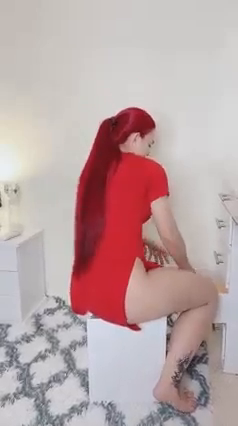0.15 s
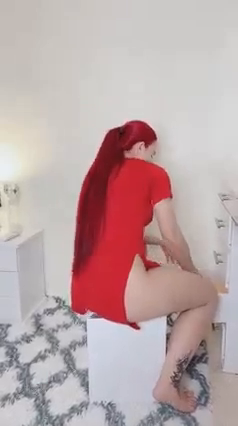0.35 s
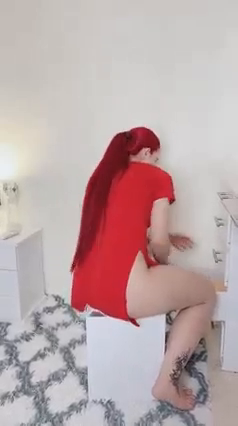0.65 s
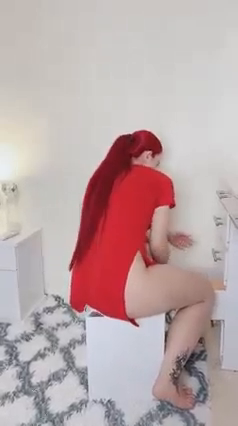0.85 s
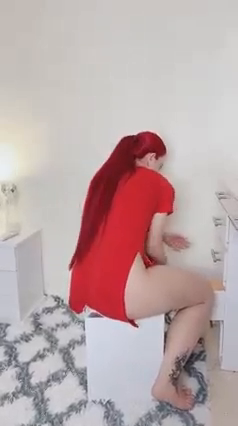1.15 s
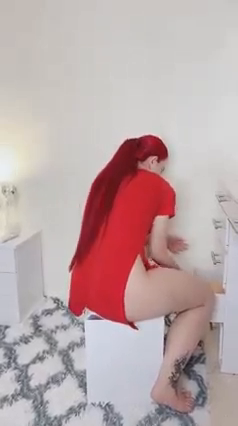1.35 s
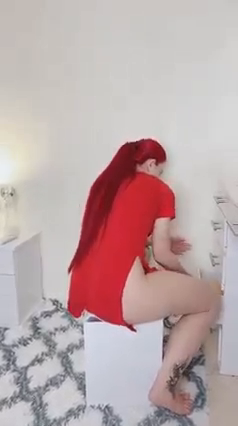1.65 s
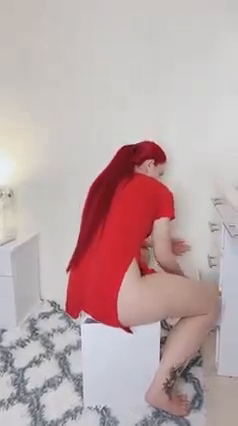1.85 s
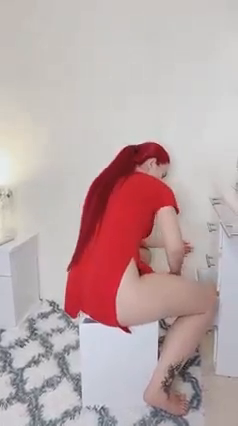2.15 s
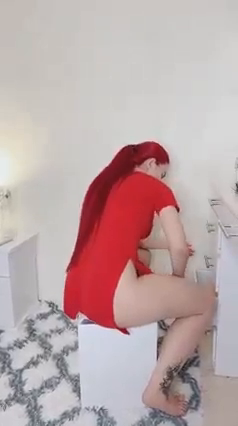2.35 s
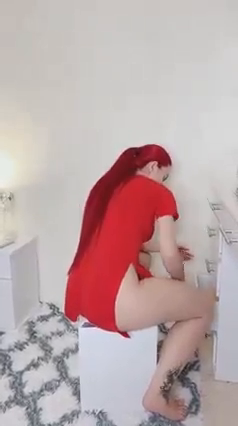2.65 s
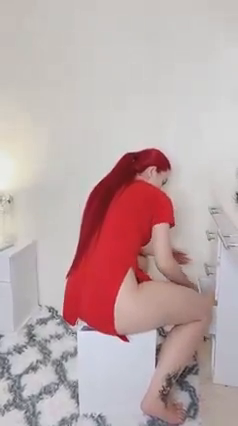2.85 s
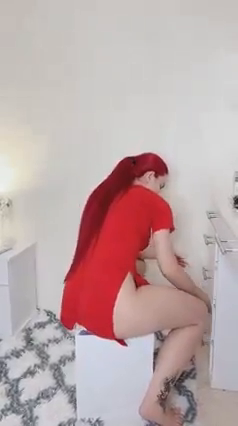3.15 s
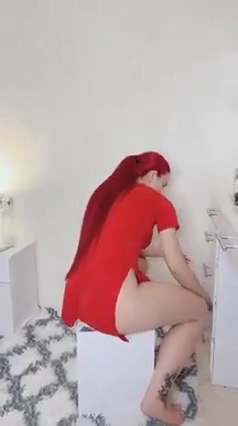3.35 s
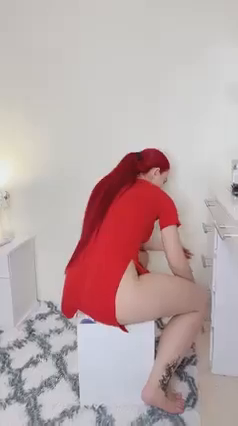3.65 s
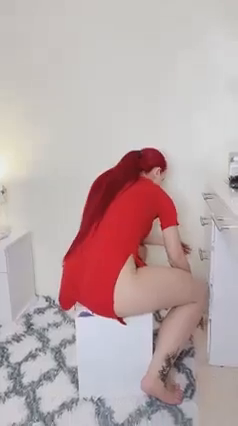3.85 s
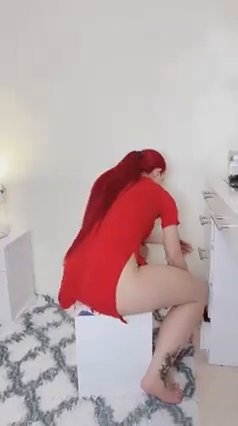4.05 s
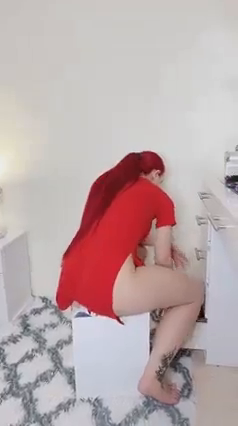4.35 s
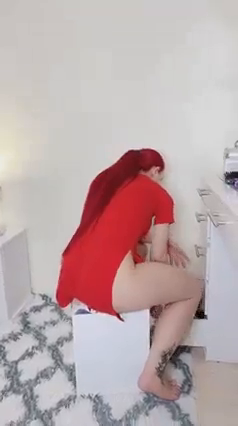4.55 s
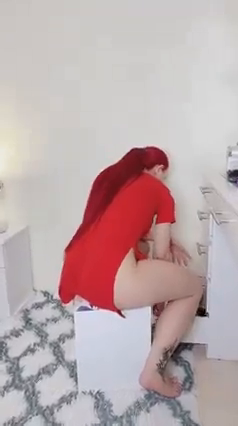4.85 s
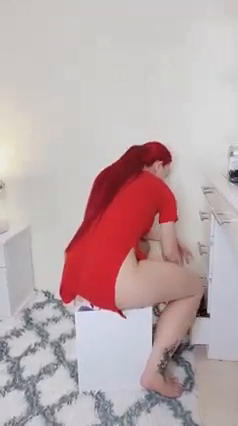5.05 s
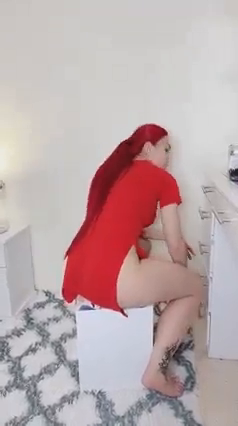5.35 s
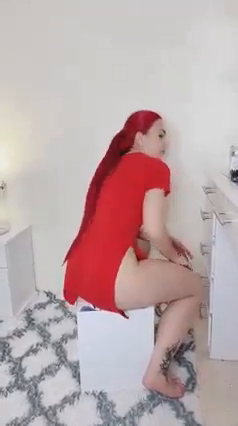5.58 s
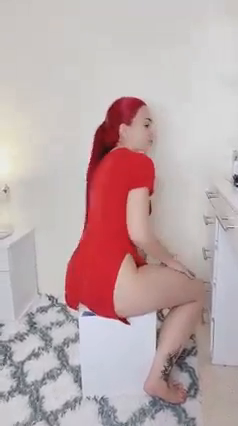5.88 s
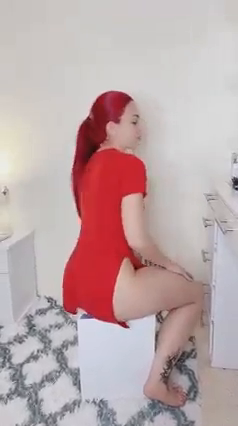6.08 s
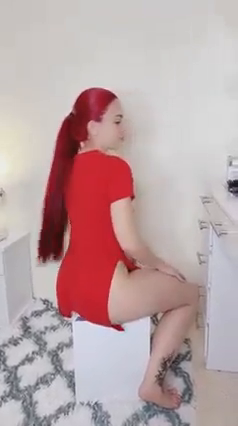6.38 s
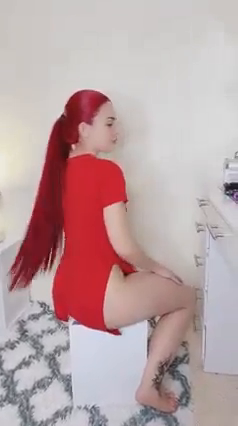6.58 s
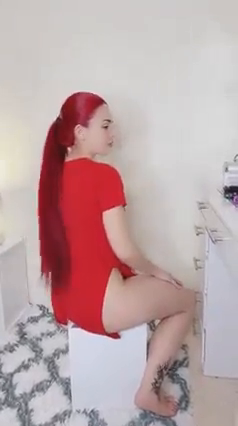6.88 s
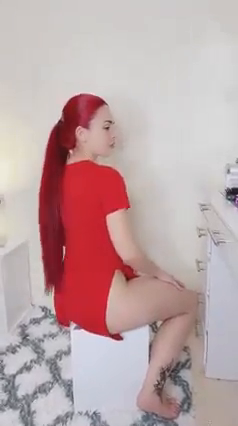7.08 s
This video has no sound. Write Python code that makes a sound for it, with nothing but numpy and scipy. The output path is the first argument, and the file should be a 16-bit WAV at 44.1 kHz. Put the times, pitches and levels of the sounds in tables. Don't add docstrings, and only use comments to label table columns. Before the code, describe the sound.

Wooden drawers thud and scrape in a quiet bedroom, with hollow cabinet booms, dry cracks, a small rolling rattle and faint cloth rustle.

```python
import sys
import numpy as np
from scipy import signal
from scipy.fft import rfft, irfft, next_fast_len
from scipy.io import wavfile
from scipy.ndimage import uniform_filter1d

SR = 44100
rng = np.random.default_rng(int(sys.argv[2]) if len(sys.argv) > 2 else 0)


def file_out(sig):
    cols = np.atleast_2d(sig).T
    lim = np.clip(cols, -1, 1)
    pcm = np.round(lim * 32767).astype(np.int16)
    wavfile.write(sys.argv[1], SR, pcm)


def volts_from_db(level):
    exponent = np.asarray(level, float) / 20
    return 10 ** exponent


N = 318327


def evened(x):
    return x / np.sqrt(np.mean(x ** 2) + 1e-20)


def peaked(x):
    return x / np.sqrt(uniform_filter1d(x ** 2, size=441).max() + 1e-20)


def smoothed(x, size_0, size_1):
    return evened(uniform_filter1d(uniform_filter1d(x, size=size_0, axis=0), size=size_1, axis=1))


def read(points, hz):
    f, value = np.transpose(points)
    return np.interp(np.log(hz + 1), np.log(f + 1), value)


def add(mix, s, sound):
    part = mix[round(s * SR):][:len(sound)]
    part += sound[:len(part)]


def coloured(x, points):
    size = next_fast_len(x.shape[-1])
    gain = volts_from_db(read(points, np.fft.rfftfreq(size, 1 / SR)))
    return irfft(rfft(x, size) * gain, size)[..., :x.shape[-1]]


def mode(t, hz, t60, turn=0):
    return np.sin(2 * np.pi * (hz * t + turn)) * volts_from_db(-60 * t / max(t60, .01))


def blows():
    # time in seconds, strength in dB, hollow boom and
    # small panels in dB against strength, contact time in ms.
    held = [
        (0.578, -17, -14.5, -11.5, 23),
        (1.083, -35.5, 7, 0.5, 10.5),
        (1.145, -17.5, -3, -25.5, 14.3),
        (1.588, -20, -2.5, 7.4, 12),
        (1.619, -20, -21, -8.5, 21),
        (2.891, -23, -11, -21.5, 7.8),
        (4.044, -21, -3.5, 1.5, 42),
    ]
    bumps = [(0.487, -34.5, -12, 0.5, 21), (0.519, -21, -34, -5, 16), (0.619, -37.5, -7, -9.5, 5.7),
             (1.199, -33.5, 9, -5.5, 14), (1.334, -10.5, -20, -9, 29), (1.368, -4.5, -1.5, -13, 15),
             (2.704, -31.5, -11.5, -20, 12), (2.745, -14, -9.5, -6.5, 21.3), (2.851, -12, -10, -19, 6.9),
             (3.105, -9.5, -8, -7, 19.3), (3.189, -42, 7.5, 7.5, 10), (4.089, -25.5, -0.5, -0.5, 12),
             (4.338, -23, -11, -8.5, 10), (4.884, -12, -12.5, -4, 15.3), (4.919, -24.5, -9.5, -4.5, 23),
             (4.967, -31, 0, 8.5, 9.1), (5.174, -18.5, -5.5, -6, 8.6), (5.501, -18.5, -9.5, -18, 15.2),
             (5.548, -22.5, -26, -16, 7.3)]
    free = [
        (0.463, -23.5, -10, -2.5, 27),
        (0.905, -47, 2.3, -1, 16),
        (1.032, -26.5, -15.5, -19.5, 14.6),
        (1.544, -16.5, -14.5, -1, 21),
        (1.679, -37.5, 4, -13.5, 14),
        (3.244, -19.5, -10, -11.5, 23),
        (3.984, -19.5, -2, -7, 22),
        (4.389, -37.5, 2.8, -7, 11),
        (5.203, -4.5, -2, -2.7, 7.5),
    ]
    kinds = [(held, .06), (bumps, .17), (free, .28)]
    return sorted((*row, t60) for rows, t60 in kinds for row in rows)


def thuds():
    # frequency in Hz, level in dB, t60 in seconds.
    air_modes = [(103.35, 7.5, 0.4), (136.5, 3, 0.17), (79.5, -16, 0.068), (51.6, -18, 0.66)]
    panel_hz = np.geomspace(140, 455, 22)
    out, t = np.zeros(N), np.arange(SR // 3) / SR
    rows = blows()
    spots = rng.standard_normal((len(rows), 2, len(panel_hz)))
    grits = rng.standard_normal((len(rows), SR // 8))
    edges = np.clip(np.minimum(t / .003, (t[-1] - t) / .1), 0, 1)
    for (s, force_db, boom_db, small_db, contact_ms, t60), (share, shift), grit in zip(rows, spots, grits):
        u = t[:len(grit)] * 1000 / max(contact_ms, 1)
        contact = grit * u * np.exp(-2.2 * u)

        hz, sign = panel_hz * (1 + .02 * shift), np.sign(share)
        modes = np.array([a * mode(t, f, t60 * (250 / f) ** 0.79) for f, a in zip(hz, sign)])
        large = signal.fftconvolve(modes[hz < 270].sum(0), contact)[:len(t)]
        large = coloured(large, [(90, -27.5), (140, -1)])
        small = signal.fftconvolve(modes[hz >= 270].sum(0), contact)[:len(t)]
        small = coloured(small, [(340, -8.5), (460, -11), (900, -21.5)])

        boom = sum(volts_from_db(db + 1.5 * a) * mode(t, f, ring) for (f, db, ring), a in zip(air_modes, shift))
        boom = boom * (1 - np.exp(-t * 900 / max(contact_ms, 1)))

        blow = volts_from_db(-6.5) * peaked(large)
        blow = blow + volts_from_db(small_db - 2.5) * peaked(small) + volts_from_db(boom_db + 0.5) * peaked(boom)
        add(out, s - .004, volts_from_db(force_db) * blow * edges)
    return out


def cracks():
    # time in seconds, strength in dB, woody body and bright edge
    # in dB against strength, rise in ms.
    ticks = [
        (0.5099, -37.5, 6, -3, 2.4),
        (0.8976, -43, -7.5, 11.5, 4.3),
        (1.0268, -43, 0, -7, 5.8),
        (3.1035, -26.5, 8.5, 0, 13.4),
        (3.251, -39, 1.5, -16, 4.6),
        (4.3367, -32, 5.5, -5, 4.8),
        (5.1728, -37, 3, -12, 1.5),
        (5.4951, -27.5, 4, -7, 8.9),
    ]
    rattles = [(0.445, -47.5, 8, 6.5, 15), (0.4724, -38, 8.5, 6, 9.9), (0.5794, -48, 14.5, 3.5, 7.3),
               (1.0755, -44.5, 0, -23, 2.4), (1.1535, -45, 6, -5.5, 4), (1.1777, -39, -2.5, -28, 6.2),
               (1.3274, -30, 7.5, -3.5, 27), (1.3603, -22.5, -1, -3, 2.3), (1.5419, -24, 4.5, -3.5, 13.4),
               (1.6756, -45, 6.5, -4.5, 3.9), (1.8272, -62, -1, 9, 3.9), (2.155, -53, -6, -25, 3.1),
               (2.714, -46.5, 1, -6, 8.8), (2.7418, -37.5, 2, -9.5, 4), (2.8512, -37.5, 5, -16, 2.6),
               (3.19, -63, 0, -1, 8.4), (3.2294, -64.5, 25.5, -9, 5.1), (3.972, -40.5, 10, -8, 20),
               (4.0454, -33.5, 9, -14, 4.8), (4.4967, -47.5, -1, -2, 6.8), (4.8823, -36.5, 6, -10.1, 3),
               (5.2009, -16, 1.1, -4.5, 0.86)]
    tick_t60, rattle_t60 = 0.013, 0.12
    out, t = np.zeros(N), np.arange(SR // 3) / SR
    rows = sorted([(*row, tick_t60) for row in ticks] + [(*row, rattle_t60) for row in rattles])
    noises = rng.standard_normal((len(rows), len(t)))
    for (s, force_db, low_db, high_db, rise_ms, t60), noise in zip(rows, noises):
        colour = [(350, low_db - 21.5), (600, low_db + 9.5), (1100, low_db - 2),
                  (2500, -5.5), (6500, high_db - 9), (11000, high_db - 13)]
        decay = 0.92 * volts_from_db(-60 * t / 0.053) + .5 * volts_from_db(-60 * t / max(t60, .01))
        shape = decay * (1 - np.exp(-t * 1000 / max(rise_ms, .2)))
        add(out, s - .0015, volts_from_db(force_db + 12.5) * coloured(noise, colour) * shape)
    return out


def slides():
    # frequency in Hz, density in dB per Hz.
    rumble_colour = [(24, -37), (40, -5), (82, -12.5), (206, 2), (503, -14.5), (586, -13.5), (671, -29),
                     (1270, -31), (1500, -37.5), (1950, -56.5), (3300, -120)]
    hiss_colour = [(410, -32.5), (700, -2), (1150, -5.5), (1530, -9), (1760, -6.5), (4280, -14), (7700, -8),
                   (9800, -17.5), (11000, -39), (14300, -79), (22000, -120)]
    # start in seconds, length in
    # seconds, pressure in dB, pressure change in dB, load on the panels in dB.
    strokes = [
        (0.46, 0.14, -47.5, -6.5, 0),
        (1.058, 0.4, -57, 8, 13.5),
        (1.532, 0.17, -34, -28, 13.5),
        (1.71, 0.18, -62.5, -6.5, 3),
        (2.767, 0.49, -50.5, -4.5, 3),
        (4.01, 0.53, -50, -8, -1),
        (4.463, .14, -61, 1.5, 14.5),
        (4.734, 0.12, -75.5, 23, 1.5),
        (4.857, 0.33, -48.5, -2.5, 9.5),
        (5.28, .2, -57.5, -8.5, 26),
    ]
    # start in seconds, length in seconds, level in dB.
    rustles = [
        (-.3, 1, -70),
        (1.81, 0.64, -66.5),
        (2.38, 0.42, -66.5),
        (3.435, 1, -72.5),
        (5.54, .35, -69.5),
        (5.954, 0.94, -70.5),
    ]
    attack_s, release_s = 0.017, 0.051
    creak_db = 4
    shake_db, shake_t60, shake_rise_s = -26.5, 0.67, 0.011
    t = np.arange(N) / SR
    slips = (rng.random(N) < 600 / SR) * rng.uniform(-1, 1, N)
    rumble = evened(coloured(evened(slips) + .5 * rng.standard_normal(N), rumble_colour))
    grip = evened(uniform_filter1d(rng.standard_normal(N), size=900))
    hiss = evened(coloured(rng.standard_normal(N), hiss_colour) * volts_from_db(1.8 * np.tanh(grip)))

    low, high, after = np.zeros(N), np.zeros(N), t[:SR]
    for s, length, db, change_db, load_db in strokes:
        touch = np.clip(np.minimum((t - s) / attack_s, (s + length - t) / release_s + 1), 0, 1)
        pressure = touch * volts_from_db(db + change_db * np.clip((t - s) / length, 0, 1))
        low, high = low + volts_from_db(load_db) * pressure, high + pressure
    for s, length, db in rustles:
        brush = volts_from_db(db) * np.sin(np.pi * np.clip((t - s) / length, 0, 1))
        low, high = low + volts_from_db(creak_db) * brush, high + brush
    for s, db, *_ in blows():
        shudder = volts_from_db(db + shake_db - 60 * after / shake_t60)
        add(low, s, shudder * (1 - np.exp(-after / shake_rise_s)))
    return low * rumble + high * hiss


def rings():
    # time in seconds, level in dB, pitch in Hz, t60 in seconds.
    knobs = [
        (.899, -40, 2275, 0.036),
        (0.9, -54, 1294, 0.21),
        (1.203, -34.5, 1260, 0.049),
        (1.366, -18, 2015, 0.032),
        (4.048, -18, 635, 0.14),
        (4.049, -26, 868, 0.091),
        (4.341, -24, 667, 0.18),
        (4.886, -39, 1222, 0.29),
    ]
    loose = [
        (1.83, -57, 2200, 0.09),
        (1.826, -53, 3270, 0.08),
        (5.496, -42, 2060, 0.13),
        (5.525, -48, 2130, 0.14),
        (5.496, -33, 1310, 0.2),
        (4.949, -48, 1220, 0.18),
        (5.205, -13, 563.5, .14),
        (5.206, -22, 757, 0.1),
        (5.497, -50, 644, .15),
    ]
    # ratio to the lowest tone, level in dB.
    tin = [(1, 0), (1.06, -9), (1.31, -4), (1.39, -10.5), (2.72, -16), (2.4, -19)]
    out, t, one = np.zeros(N), np.arange(SR // 3) / SR, [(1, 0)]
    rows = [(*row, .12, one) for row in knobs] + [(*row, .55, one) for row in loose]
    roll_s, roll_gap_s, roll_db, roll_fade_db, roll_hz, roll_t60 = 2.158, .0285, -49.5, -4, 1195, .1
    for k in range(6):
        turn_db = roll_db + roll_fade_db * ((k - 2.5) / 2.5) ** 2
        rows += [(roll_s + k * roll_gap_s, turn_db, roll_hz, roll_t60, .5, tin)]
    squeak_s, squeak_gap_s, squeak_db, squeak_hz, squeak_rise_hz, squeak_t60 = 4.658, .039, -63, 1540, 38, .25
    for k in range(4):
        rows += [(squeak_s + k * squeak_gap_s, squeak_db, squeak_hz + k * squeak_rise_hz, squeak_t60, .5, one)]

    for (s, db, hz, t60, chatter, tones), noise in zip(rows, rng.standard_normal((len(rows), len(t)))):
        flutter = evened(uniform_filter1d(uniform_filter1d(noise, size=160), size=160))
        tone = sum(volts_from_db(tone_db) * mode(t, hz * ratio, t60) for ratio, tone_db in tones)
        roughness = 1 - chatter + chatter * flutter
        add(out, s, volts_from_db(db) * tone * roughness * np.minimum(t / 0.0017, 1))
    return out


def tail(start):
    # frequency in Hz, t60 in seconds.
    decay_times = [(100, .45), (300, 0.28), (1000, 0.33), (3000, 0.31), (9000, 0.24)]
    taps = np.zeros(SR // 2)
    at = np.arange(start, len(taps) - 20, 20)
    taps[at + rng.integers(0, 20, len(at))] = rng.choice([-1., 1.], len(at))
    hz, t, z = signal.stft(taps, SR, nperseg=256)
    out = signal.istft(z * volts_from_db(-60 * t / read(decay_times, hz)[:, None]), SR, nperseg=256)[1]
    return out / np.linalg.norm(out)


def bedroom(x, wet_db, direct_side):
    mid = x + volts_from_db(wet_db) * signal.fftconvolve(x, tail(start=200))[:N]
    turned = signal.hilbert(mid, next_fast_len(N))[:N] * np.exp(1.5j)
    side = direct_side * turned.real + 0.49 * signal.fftconvolve(x, tail(start=60))[:N]
    return np.array([mid, side])


def room_tone():
    # frequency in Hz, density in dB per Hz.
    air_colour = [(15, -33), (25, -3.5), (101, 1), (169, -12), (327, -14), (353, -9), (468, -26),
                  (531, -20.5), (819, -30.5), (2270, -34.5), (2450, -36.5), (3970, -39), (11000, -44),
                  (14300, -85), (22000, -120)]
    hz, t, z = signal.stft(rng.standard_normal((2, N + 2048)), SR, nperseg=1024)
    patches = smoothed(rng.standard_normal(z.shape[1:]), 10, 6)
    gain = volts_from_db(read(air_colour, hz)[:, None] + 1.7 * patches)
    air = signal.istft(z * gain, SR, nperseg=1024)[1][:, :N]
    return volts_from_db(-54) * evened(air)


def whine():
    hz = 2465
    band = [(hz * .96, -40), (hz, 0), (hz * 1.04, -40)]
    return volts_from_db(-83.5) * evened(coloured(rng.standard_normal(N), band))


def narrowed(side):
    # frequency in Hz, margin in patch deviations.
    margin = [(1500, 3.5), (2000, .5), (3000, 1.1), (4500, -.2), (5500, .4), (6500, 1.4), (8000, 2.5)]
    hz, t, z = signal.stft(side, SR, nperseg=1024)
    patches = smoothed(rng.standard_normal(z.shape), 18, 14)
    kept = np.clip((read(margin, hz)[:, None] + patches) * 4, .01, 1)
    return signal.istft(z * kept, SR, nperseg=1024)[1][:N]


def trimmed(x):
    # lower edge in Hz, upper edge in Hz, weakest kept level in dB,
    # weakest kept level against the band below in dB.
    top_bands = [(9000, 9650, -95, -24), (9650, 10350, -93, -21), (10350, 11050, -91, -20),
                 (11050, 12100, -94, -25)]
    fuzz_db, quiet_db = -84.5, -89.5
    hz, t, z = signal.stft(x, SR, nperseg=1024)
    power = (abs(z) ** 2).mean(0)
    below_db = 10 * np.log10(power[(hz > 6000) & (hz < 8200)].mean(0) + 1e-20)
    kept = np.ones(power.shape)
    for low, high, weakest_db, against_db in top_bands:
        band = (hz >= low) & (hz < high)
        level_db = 10 * np.log10(uniform_filter1d(power[band].mean(0), size=3) + 1e-20)
        strong = (level_db > weakest_db) & (level_db - below_db > against_db)
        kept[band] = np.where(strong, 1, .003)
    fuzz = signal.stft(rng.standard_normal(x.shape[1]), SR, nperseg=1024)[2]
    fuzz = fuzz * (hz[:, None] > 9000) * (below_db < quiet_db)
    slope = volts_from_db(read([(11500, 0.5), (13000, -6)], hz))[:, None]
    return signal.istft((z * kept + volts_from_db(fuzz_db) * fuzz * slope), SR, nperseg=1024)[1][:, :N]


def scene():
    # frequency in Hz, level in dB.
    side_colour = [(60, -56.5), (150, -55), (300, -14.5), (600, -1.5), (1300, 1), (1650, -16),
                   (1900, -25.5), (2200, -4.5), (3200, 2.5), (4300, -3.5), (5300, -5.5), (6500, 2),
                   (8800, -2.5), (9400, -9.5), (11500, -32.5)]
    wood = thuds() + rings() + volts_from_db(-1.5) * slides()
    room = bedroom(wood, wet_db=-7, direct_side=.5) + bedroom(cracks(), wet_db=-2.5, direct_side=.5)
    mid, side = room + room_tone() + whine()
    side = narrowed(coloured(side, side_colour))
    return np.array([mid + side, mid - side])


def roll_off(x):
    return signal.sosfilt(signal.butter(12, 15700, fs=SR, output="sos"), x)


def record(dry):
    # frequency in Hz, level in dB.
    mic_colour = [(20, -14.5), (60, -4), (7000, 0.5), (8800, -3), (10200, -8), (11900, -22), (12050, -70.5)]
    limited = np.tanh(dry / 1.17) * 1.246
    return roll_off(trimmed(coloured(limited, mic_colour)))


dry = scene()
out = record(dry)
file_out(out)
```